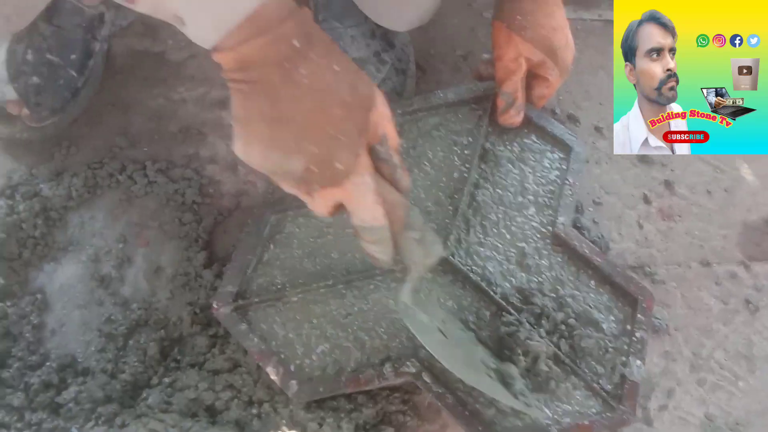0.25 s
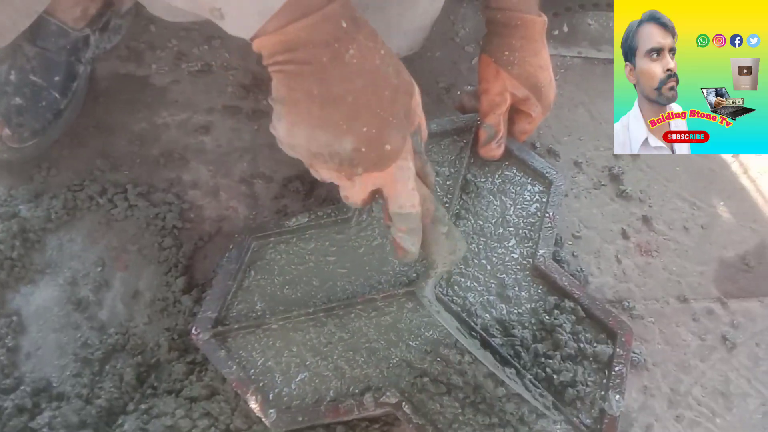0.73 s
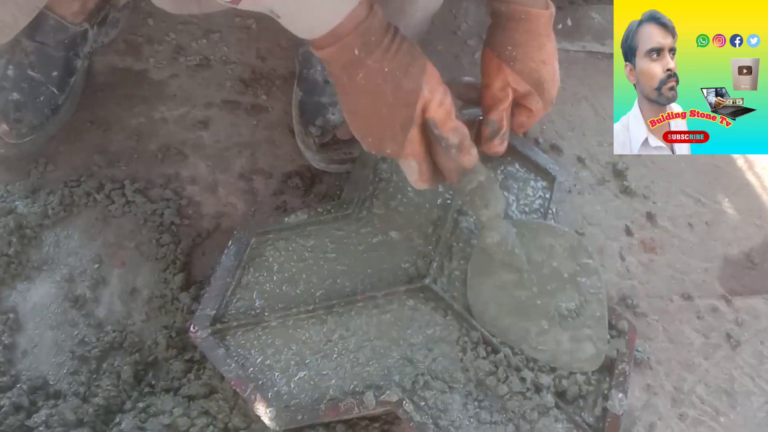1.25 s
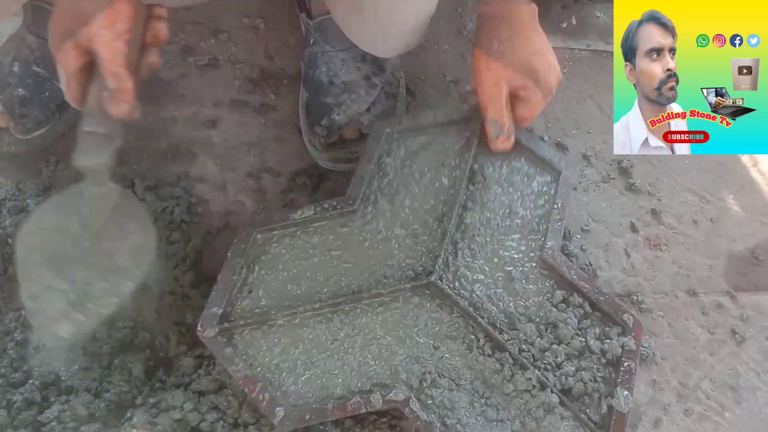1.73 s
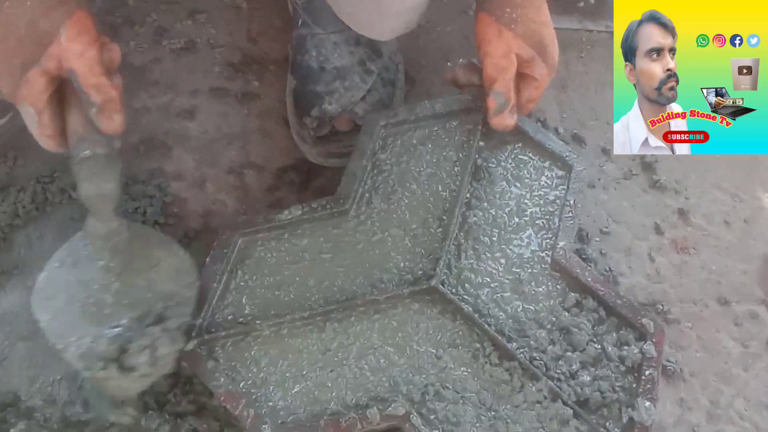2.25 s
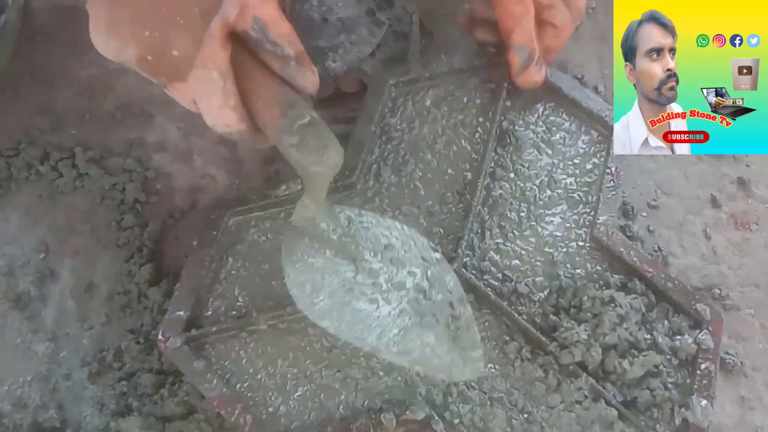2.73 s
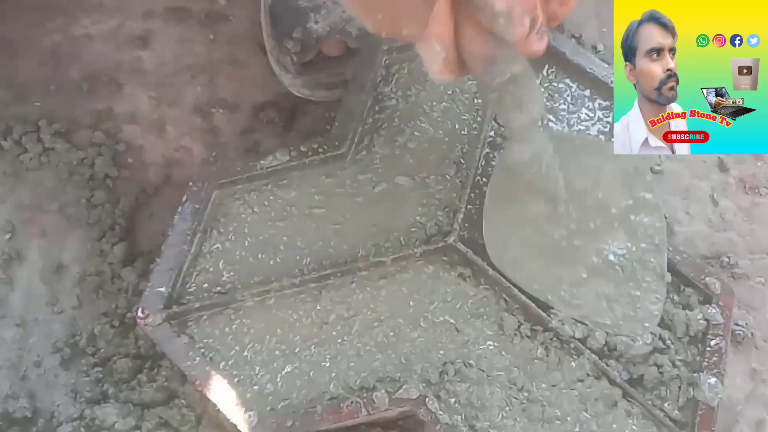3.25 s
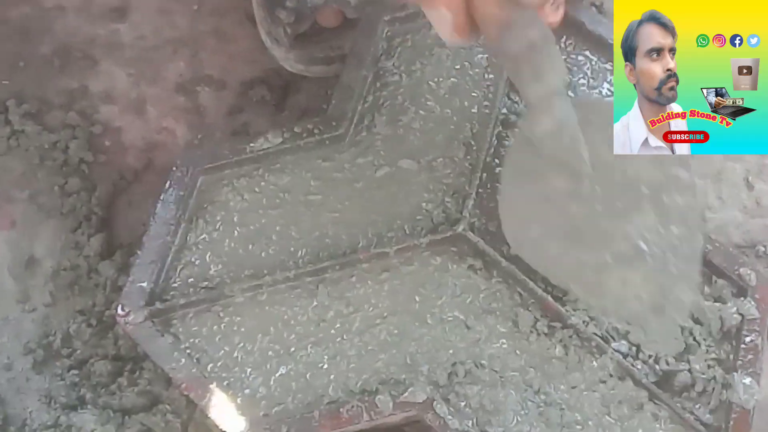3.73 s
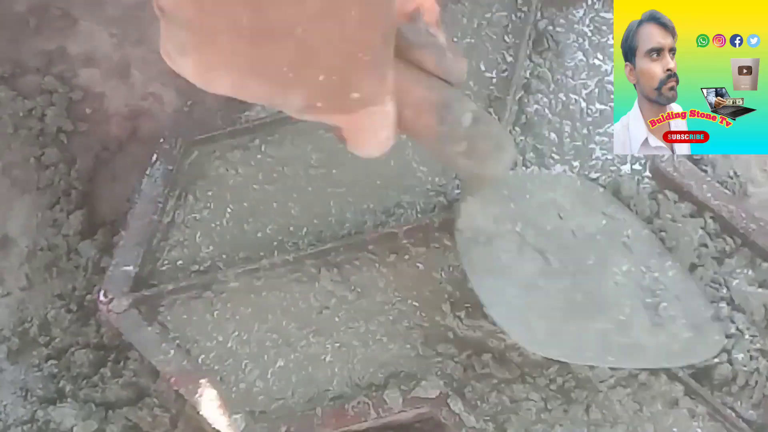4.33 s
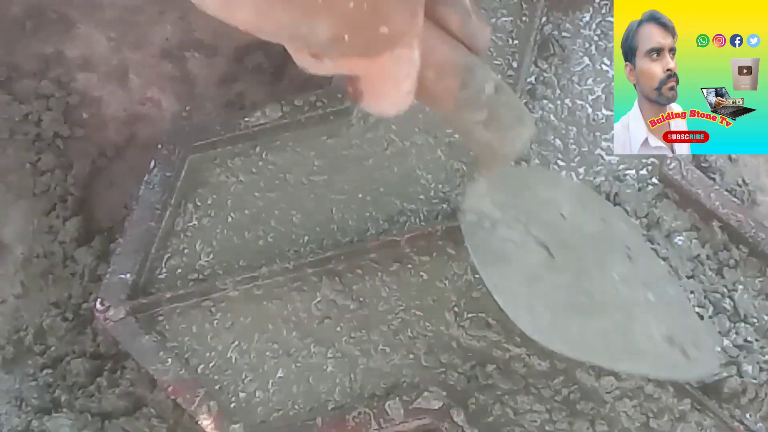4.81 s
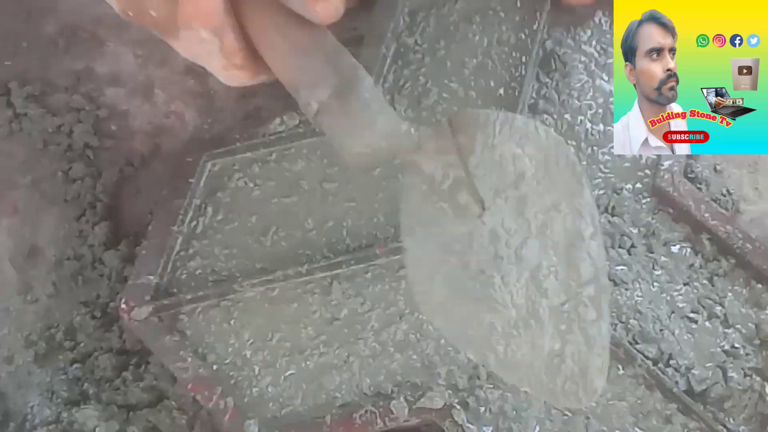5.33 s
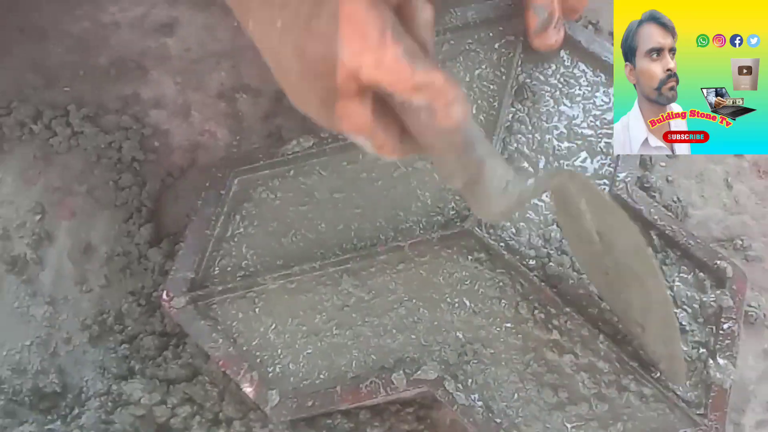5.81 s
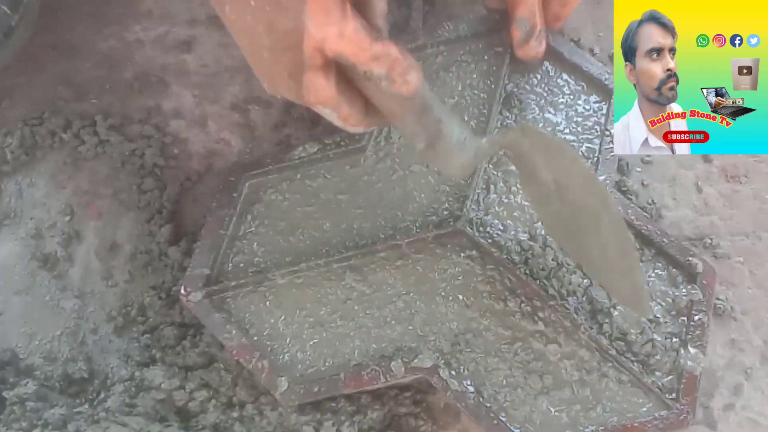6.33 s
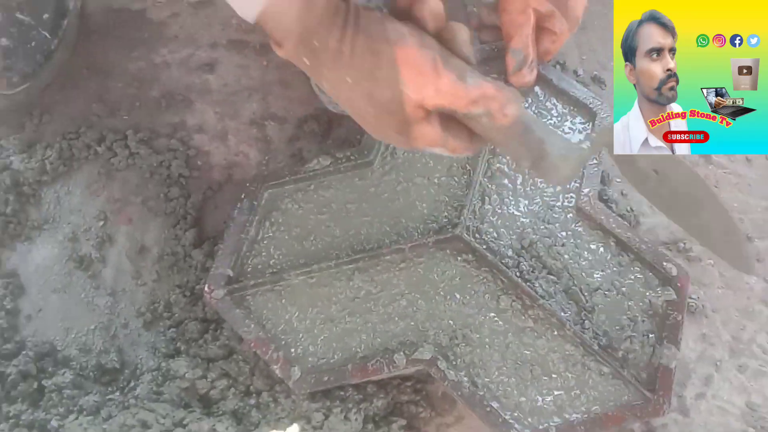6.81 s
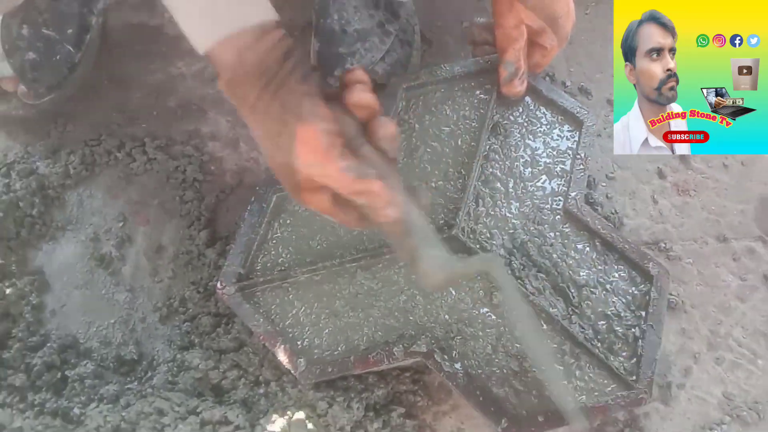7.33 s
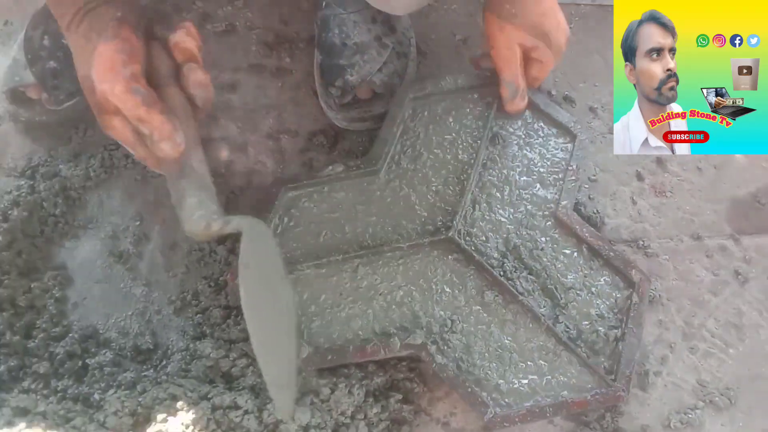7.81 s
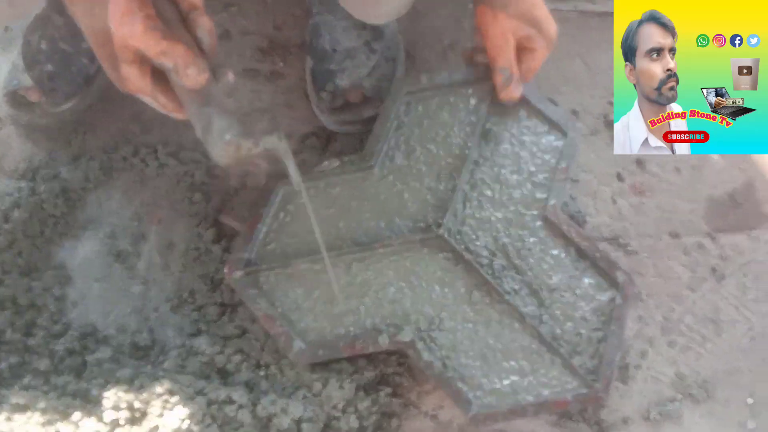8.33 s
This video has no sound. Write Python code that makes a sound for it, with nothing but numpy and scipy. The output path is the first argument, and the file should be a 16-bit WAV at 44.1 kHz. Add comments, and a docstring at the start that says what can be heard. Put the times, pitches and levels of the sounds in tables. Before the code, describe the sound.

Outdoors, very close to the microphone, a steel trowel works wet gravel concrete in a mould. Wet mix slides off with a faint hiss, two hard chops land, then dull flat pats. Scrapes and slaps follow, then a run of quick gritty chops, and finally five even, firm pats. Low rumble and a distant machine hum lie underneath, fading as a faint engine chug quickens.

```python
"""Outdoors, at a paving mould, a steel trowel pats, chops and smooths wet gravel concrete close by.
Flat pats slap the mix and knock the mould: noise bursts drive the slap's pitch and the mould's resonances.
Edge chops, flicked stones and strokes grind grit against the ringing blade: random contacts drive its modes.
Far off, a machine hums on two sine waves, and a slow single-cylinder engine chugs and gathers speed:
one puff for each firing. Wet sand slides off the blade, and coloured noise makes the rumble and open air."""
import sys
import numpy as np
from scipy import signal
from scipy.fft import rfft, irfft, next_fast_len
from scipy.io import wavfile
from scipy.ndimage import uniform_filter1d, map_coordinates

SR = 44100
rng = np.random.default_rng(int(sys.argv[2]) if len(sys.argv) > 2 else 0)


def wav_record(signal):
    """Record a signal, one row per channel, as 16-bit PCM in the file named by sys.argv[1]."""
    frames = np.transpose(np.atleast_2d(signal))
    bounded = np.clip(frames, -1, 1)
    # unit amplitude maps onto the largest positive 16-bit level
    quanta = np.round(bounded * 32767).astype(np.int16)
    wavfile.write(sys.argv[1], SR, quanta)


N = 377496  # length in samples

# outdoor background, before slight wavering: t/s, rumble level/dB, air level/dB
BACKGROUND_LEVELS = [(0, -38.5, -46), (.65, -30.5, -42), (1.1, -33.5, -52.5), (1.7, -31, -39),
                     (3.1, -32.5, -47), (3.6, -35, -48.5), (4.3, -47, -52), (6.2, -47.5, -50.5),
                     (7.0, -39, -48), (8.56, -45.5, -52)]
# tone colour of the rumble, of the open air: f/Hz, level/dB
RUMBLE_COLOUR = [(20, -20), (50, -44.5), (66, -12.5), (80, -6.5), (118, 1.5), (160, -3.5), (250, -7.5),
                 (400, -21), (700, -27.5), (2000, -78.5)]
AIR_COLOUR = [(200, -0.5), (480, 12), (680, 1), (900, 9), (1100, -2), (1280, 12), (1500, -0.5),
              (2300, -4.5), (3000, -21), (4000, -21), (5900, -32.5), (7000, -38.5), (16000, -45)]
# hum of the distant machine, before slight wavering: t/s, level/dB
HUM_LEVELS = [(.4, -34), (1.15, -36), (1.45, -30), (3.7, -39), (4.3, -49)]
# the machine's hum before and after it takes up load, when it slows and how long that takes
HUM_HZ, LOADED_HZ, SLOWS_AT_S, SLOWING_S = 132, 120.3, 2.2, 0.242

# speed of the single-cylinder engine: t/s, firings a second/Hz
ENGINE_SPEED = [(4.2, 22.5), (5.7, 22.6), (6.1, 25.6), (6.9, 28.3), (7.6, 29.7), (8.3, 30.7), (8.56, 31)]
# tone colour of its exhaust: f/Hz, level/dB
EXHAUST_COLOUR = [(30, -50), (65, -41), (95, 0), (125, -0.5), (170, 2), (250, -2), (330, -23), (430, -3.5),
                  (560, -30), (1500, -67), (5000, -55.5)]
# the engine draws near until ARRIVES_S, then grows louder with its speed (dB for each added firing a second)
IDLE_DB, DB_PER_FIRING_RATE, ARRIVES_S, APPROACH_DB_PER_S = -48.5, 1.6, 2.6, 10

# a load of mix slides off the blade: t/s, hiss level/dB, hiss centre f/Hz
SLIDING_MIX = [(0.0, -49.5, 5500), (0.154, -44, 5400), (0.16, -42, 5400), (0.204, -40.5, 5300),
               (0.214, -33, 5180), (0.244, -38, 5700), (0.382, -40.5, 4440), (0.416, -30, 4180),
               (0.48, -51, 4170)]

# strokes of the blade through the mix, before a trim for each layer:
# t/s, length/s, grinding level/dB, sand hiss level/dB
BLADE_STROKES = [(0.19, 0.26, -42.5, -59.5), (0.36, 0.11, -35.5, -52), (0.455, 0.14, -49.5, -54),
                 (0.56, 0.049, -36, -49), (0.635, .055, -48, -67), (0.73, 0.039, -40.5, -52),
                 (0.79, .045, -42.5, -62), (1.853, 0.066, -19, -39.5), (1.9, 0.16, -27.5, -38),
                 (2.52, 0.16, -51, -66), (3.265, 0.26, -23.5, -35.5), (3.69, 0.21, -18, -30.5),
                 (4.346, 0.023, -17.5, -30), (4.94, 0.064, -35, -49.5), (6.912, 0.16, -23.5, -35),
                 (7.184, 0.08, -17, -29.5), (7.312, 0.12, -17.5, -36.5), (7.41, 0.082, -36, -49.5),
                 (7.485, 0.084, -37, -37), (7.573, 0.039, -32.5, -41), (7.73, 0.11, -50.5, -59.5)]
# pressure swells and eases in one arch over a stroke (higher is more pointed); crumbs settle after it
ARCH, SETTLE_S = 0.89, 0.0069
# the drag after a chop: wait, sand hiss relative to grinding
DRAG_WAIT_S, DRAG_HISS_DB = 0.011, -13

# resonances of the blade, of the filled mould: f/Hz, width/Hz, level/dB
BLADE_MODES = [(980, 40, -2), (1275, 24, 2), (1355, 40, 0), (1570, 55, 1), (1920, 45, 1), (2130, 70, -4),
               (2272, 48, 3), (2615, 45, 3), (2845, 40, -2), (3390, 50, -3), (3830, 80, 1), (4200, 80, -1),
               (4600, 50, -4), (5240, 60, 0), (5730, 100, -1), (5930, 80, 2), (7360, 70, 1), (8280, 120, 1),
               (9200, 80, -1), (10900, 160, 0)]
MOULD_MODES = [(170, 8.3, -10.5), (235.6, 19.8, 2.5), (295, 25, -4.5), (347, 152, -1), (378.5, 17, -7),
               (497, 14, 2), (561.5, 24.3, 6), (962, 183, -4)]
# a flat blade is damped by the mix, one held on edge rings: t/s, ringing share/0-1
EDGE_SHARE = [(1.3, 0), (1.9, 0.6), (3.2, 0.21), (3.9, 0.06), (4.4, 0.37), (5.7, 0.42), (6.9, 0.73)]
# tone colour of grinding grit, fine sand, the blade's edge, the mix's dead thud: f/Hz, level/dB
GRIND_COLOUR = [(150, -25), (600, -31), (900, -8.5), (1400, -0.5), (2100, 4.5), (2800, -5), (3500, -10),
                (5000, -36.5), (9000, -48)]
SAND_COLOUR = [(1500, -22.5), (2800, -3.5), (3800, -1.5), (4600, -9), (6050, -4.5), (6600, -17),
               (7500, -18), (9500, -22.5), (12000, -23.5), (16000, -10.5)]
EDGE_COLOUR = [(700, -32.5), (1300, 7), (1550, -9), (2000, 6), (2600, -4), (3200, -17.5), (4500, -33.5),
               (9000, -91)]
THUD_COLOUR = [(50, -30), (130, -10.5), (230, 0), (330, 1.5), (450, -6.5), (650, -13), (1100, -10.5),
               (3000, -67)]

# Blow levels are nominal: each layer also gets a fixed trim in blow(), which scales rise and t60 by layer too.
# the edge flicks a single stone: t/s, blow level/dB, slap f/Hz, grit level re blow/dB
FLICKED_STONES = [(0.211, -29.5, 1160, -15), (0.746, -24.5, 1290, -22.5), (1.357, -26, 1690, -42),
                  (1.872, -15.5, 2000, -20), (2.648, -24, 2170, -4), (4.056, -26.5, 1550, -15),
                  (5.785, -33.5, 2280, -3.5), (7.222, -11.5, 1470, -43), (7.409, -12, 2420, -26.5)]
# a stone: its dying away, the mould's knock re the blow, the steel's ring over the grit
STONE_T60_S, STONE_KNOCK_DB, STONE_BLADE_DB = 0.065, -15, 3.5
# chops with the edge, each followed by a drag as the blade is drawn out: t/s, blow level/dB, slap f/Hz,
# mould knock level re blow/dB, grit level re blow/dB, drag level/dB, drag length/s
EDGE_CHOPS = [(1.176, -1, 1605, -26, -27.5, -36, 0.047), (1.295, -5, 1670, -14.5, -21.5, -57, 0.029),
              (3.25, -4.5, 1500, -40, -17, -32.5, 0.1), (3.64, -9.5, 2000, -26.5, -15, -18, 0.029),
              (4.076, -1.5, 1530, -39, -33, -35.5, 0.082), (4.324, -19, 1690, -6, -19.5, -32.5, 0.12),
              (4.563, -7.5, 1800, -48, -19, -29.5, 0.092), (4.734, -10.5, 1960, -17.5, -15, -35.5, 0.11),
              (4.895, -18, 2040, -27, -19.5, -31, .03), (5.651, -7, 2040, -15.5, -20, -32, 0.055),
              (5.804, -11, 2020, -24.5, -11, -29, 0.071), (5.962, -12, 2320, -17, -10, -31.5, 0.073),
              (6.115, -5.5, 2300, -25, -17.5, -25, 0.055), (6.257, -10, 2400, -24.5, -15, -30.5, .055),
              (6.396, -11.5, 2200, -22, -12, -36, 0.053), (6.586, -21.5, 1240, -7, 0.5, -38, .07),
              (6.910, -8, 1280, -12, -23, -30, 0.063), (7.157, -6, 1230, -20, -19, -40, .04),
              (7.286, -9, 1550, -23.5, -15, -29, 0.043)]
# a chop: time to full contact, its dying away, the steel's ring over the grit that excites it
CHOP_RISE_S, CHOP_T60_S, BLADE_OVER_GRIT_DB = 0.0023, 0.045, 5
# at full contact the edge of a chop cracks against a stone: level re the blow
CRACK_DB = -18
# flat pats on the mix: t/s, blow level/dB, slap f/Hz, mould knock level re blow/dB,
# grit level re blow/dB, t60/s (time to die away by 60 dB)
FLAT_PATS = [(0.82, -26, 660, -2.5, -38, 0.055), (1.624, -3.5, 630, -13, -31.5, .04),
             (1.698, -21.5, 1020, -3, -51, .035), (1.802, -8, 616, -7, -27, 0.064),
             (1.965, -5, 553, -10.5, -39, 0.031), (2.119, -16, 573, -10, -32.5, 0.036),
             (2.810, -1.5, 960, -15, -35, .026), (3.004, -3.5, 1054, -14, -42.5, 0.019),
             (4.323, -6, 960, -10, -38, 0.038), (5.133, -3, 960, -11.5, -46, 0.048),
             (5.209, -22, 600, -7.5, -64, 0.044), (5.306, -6.5, 794, -7.5, -55.5, .06),
             (5.483, -9, 550, -4.5, -44.5, .055), (6.531, -4, 1014, -14, -33.5, 0.02),
             (6.719, -4.5, 1220, -10.5, -38, .055), (6.763, -25, 510, -3, -30.5, 0.032),
             (7.836, -2, 1154, -17, -42.5, 0.048), (7.983, -5, 1225, -11, -50, 0.026),
             (8.128, -7, 1190, -9, -32.5, .032), (8.283, -4.5, 1170, -11.5, -46, 0.054),
             (8.431, -15.5, 470, -1, -59, 0.063)]
# a pat: time to full contact, the steel at full force, its dB re the blow lost for each dB softer
PAT_RISE_S, PAT_BLADE_DB, SOFT_DULLS = .0036, -12.5, 0.66
# the mould rocks on the ground after a pat: level re its knock, dying away
ROCK_DB, ROCK_T60_S = -17, 1
LEAD = SR // 100  # samples of brushing contact before a blow bites

# microphone port: f/Hz, level/dB
PORT_COLOUR = [(13000, -1), (14200, -5), (14900, 4), (15500, 6), (15800, -14), (16300, -15)]
TOP_HZ = 16300  # band limit
# the loudest peaks round off before the port: ceiling in dB full scale
CEILING_DB = -3


def amp(db):
    """Turn decibels into gain."""
    return 10 ** (np.asarray(db) / 20)


def unit(x):
    """Bring x to rms 1."""
    return x / np.sqrt(np.mean(x ** 2) + 1e-20)


def punch(x):
    """Bring the loudest few milliseconds of x to rms 1."""
    return x / np.sqrt(uniform_filter1d(x * x, size=300).max())


def curves(rows):
    """Draw one value per sample for each column after the time."""
    s, *cols = np.transpose(rows)
    return [np.interp(np.arange(N) / SR, s, c) for c in cols]


def wobble(rate):
    """Draw a smooth random curve with this many knots a second."""
    knots = rng.standard_normal(int(N * rate / SR) + 4)
    return map_coordinates(knots, [np.arange(N) * rate / SR])


def add(out, s, x):
    """Mix x into out from time s on."""
    part = out[round(s * SR):][:len(x)]
    part += x[:len(part)]


def filtered(x, response):
    """Multiply the spectrum of x by a response that depends on frequency."""
    m = 2 * next_fast_len(len(x) // 2 + 2048)
    return irfft(rfft(x, m) * response(np.fft.rfftfreq(m, 1 / SR)), m)[:len(x)]


def colour(points, hz):
    """Make a response without pre-echo that follows (Hz, dB) points on a log axis."""
    f, db = np.transpose(points)
    gain = amp(np.interp(np.log(hz + 1), np.log(f), db))
    cepstrum = irfft(np.log(gain))
    # folding the cepstrum forward in time puts all sound after the cause
    cepstrum[1:len(hz) - 1] *= 2
    cepstrum[len(hz):] = 0
    return np.exp(rfft(cepstrum))


def shaped(x, points):
    """Colour x by a spectrum, at rms 1."""
    return unit(filtered(x, lambda hz: colour(points, hz)))


def ringing(modes, hz):
    """Add up resonances (Hz, width, dB) of alternating sign; a narrow one rings longer."""
    total = 0
    for k, (centre, width, db) in enumerate(modes):
        resonance = 1j * hz * width / (centre * centre - hz * hz + 1j * hz * width)
        total = total + (-1) ** k * amp(db) * resonance
    return total


def grit(size, per_second, spread_db, smooth):
    """Scatter tiny contacts of uneven strength over a share of smooth noise."""
    hits = rng.random(size) < per_second / SR
    strength = amp(spread_db * rng.uniform(-0.94, 1, size))
    contacts = hits * rng.standard_normal(size) * strength
    return unit(unit(contacts) + smooth * rng.standard_normal(size))


def on_blade(x, share):
    """Send a share of the contact force x into the resonances of the steel."""
    share = np.clip(share, 0, 1)
    ring = unit(filtered(x, lambda hz: ringing(BLADE_MODES, hz)))
    return (1 - share) * unit(x) + share * ring


def edge_share(s):
    """Look up how freely the blade rings at time s."""
    return np.interp(s, *np.transpose(EDGE_SHARE))


def open_air():
    """Low rumble and open air are coloured noises whose levels waver."""
    rumble_db, air_db = curves(BACKGROUND_LEVELS)
    rumble = amp(rumble_db + 2.1 * wobble(25)) * shaped(rng.standard_normal(N), RUMBLE_COLOUR)
    air = amp(air_db + 1.2 * wobble(6.7)) * shaped(rng.standard_normal(N), AIR_COLOUR)
    return rumble + air


def machine_hum():
    """A far machine hums on a wavering tone and its half-speed tone, slows and recedes."""
    hum_hz, = curves([(SLOWS_AT_S, HUM_HZ), (SLOWS_AT_S + SLOWING_S, LOADED_HZ)])
    hum_db, = curves(HUM_LEVELS)
    phase = 2 * np.pi * np.cumsum(hum_hz + 1.12 * wobble(9)) / SR
    tones = unit(np.sin(phase) + .33 * np.sin(phase / 2))
    return amp(hum_db + 2.4 * wobble(13)) * tones


def engine():
    """Each firing gives one exhaust puff, a little uneven and dulled by distance; faster is louder."""
    rate, = curves(ENGINE_SPEED)
    still_to_come = np.maximum(ARRIVES_S - np.arange(N) / SR, 0)
    db = IDLE_DB + DB_PER_FIRING_RATE * (rate - rate[0]) - APPROACH_DB_PER_S * still_to_come
    cycles = np.cumsum(rate) / SR
    firings = np.diff(np.floor(cycles), prepend=0) * amp(1.3 * wobble(30))
    gas = amp(-45 * (cycles % 1)) * rng.standard_normal(N)  # noise that fades after each firing
    puffs = filtered(unit(firings) + .3 * unit(gas), lambda hz: 1 / (1 + (hz / 1500) ** 4))
    return amp(db) * shaped(puffs, EXHAUST_COLOUR)


def slide():
    """Wet sand hisses off the tilted blade, lower overall in pitch as more of the steel is bared."""
    s, db, centre_hz = np.transpose(SLIDING_MIX)
    unevenness = amp(1.6 * wobble(90) + 1.2 * wobble(300))
    grains = unevenness * grit(N, per_second=1500, spread_db=5, smooth=.6)
    # boost a band around the moving centre
    hz, t, z = signal.stft(shaped(grains, SAND_COLOUR), SR, nperseg=256)
    octaves = np.log2((hz[:, None] + 1) / np.interp(t, s, centre_hz))
    boost = amp(10.3 * np.exp(-(octaves / 0.43) ** 2))
    hiss = signal.istft(z * boost, SR, nperseg=256)[1][:N]
    hiss = hiss / np.std(hiss[:int(s[-1] * SR)])
    hiss = hiss + amp(-17) * shaped(grains, GRIND_COLOUR)
    return hiss * amp(np.interp(np.arange(N) / SR, s, db + 0.16, right=-120))


def scrape(gain, force, share, spectrum):
    """A rough force at the given rms gain drives the blade, whose resonances drift as it flexes."""
    flex = np.arange(N) + .0002 * SR * wobble(20)
    steel = map_coordinates(on_blade(gain * force, share), [flex])
    return np.sqrt(np.mean(gain ** 2)) * shaped(steel, spectrum)


def strokes():
    """In strokes and drags, gravel catches and slips along the ringing blade; fine sand hisses above."""
    gains = np.zeros((2, N))
    drags = [(s + DRAG_WAIT_S, length, db, db + DRAG_HISS_DB) for s, *_, db, length in EDGE_CHOPS]
    for s, length, grind_db, hiss_db in list(BLADE_STROKES) + drags:
        pressure = np.abs(np.sin(np.linspace(0, np.pi, int(length * SR)))) ** ARCH
        add(gains[0], s, amp(grind_db) * pressure)
        add(gains[1], s, amp(hiss_db) * pressure)
    keep = np.exp(-1 / (SETTLE_S * SR))
    grind_gain, hiss_gain = signal.lfilter([1 - keep], [1, -keep], gains + 1e-9)
    free, = curves(EDGE_SHARE)
    catching = amp(1.7 * wobble(70) + 1.5 * wobble(260))
    pebbles = .5 * grit(N, per_second=300, spread_db=4, smooth=0)
    gravel = catching * (pebbles + grit(N, per_second=2000, spread_db=5.5, smooth=1.0))
    sand = catching * (pebbles + grit(N, per_second=3300, spread_db=1.5, smooth=1.0))
    grinding = amp(-1.8) * scrape(grind_gain, gravel, free, GRIND_COLOUR)
    hiss = amp(-3.0) * scrape(hiss_gain, sand, free * .6, SAND_COLOUR)
    return grinding + hiss


def burst(t, rise, t60, tail_db, tail_t60, touch_db):
    """The blade brushes the top stones, bites at t = 0, stops, and the mix settles in a weak tail."""
    late = np.maximum(t - rise, 0)
    touch = amp(touch_db) * np.clip(1 + t / 0.0065, 0, 1)
    attack = np.clip(t / rise, touch, 1)
    decay = amp(-60 * late / t60) + amp(tail_db - 60 * late / tail_t60)
    return attack * decay * grit(len(t), per_second=6000, spread_db=8.0, smooth=0.26)


def blow(slap_hz, knock_db, blade_db, grit_db, rise, t60, free):
    """One blow squeezes wet mix, knocks the mould, rings the blade and crushes sand."""
    t = np.arange(-LEAD, SR // 5) / SR
    cushion_db = np.interp(slap_hz, [1200, 1500], [-18, -40])  # only low, flat pats land softly
    # the pocket of slurry under the blade sets the pitch of the slap
    pocket = [(slap_hz / 5, -27), (slap_hz / 1.28, -8), (slap_hz, -1), (slap_hz * 2.13, -20), (slap_hz * 5, -72)]
    squeeze = burst(t, rise * 0.68, t60 * 1.32, tail_db=-30.0, tail_t60=0.14, touch_db=cushion_db)
    slap = shaped(squeeze, pocket)
    ping = np.interp(slap_hz, [1200, 1600, 2100], [.3, .9, .3])  # a small closed pocket rings best
    slap = slap + ping * unit(filtered(slap, lambda hz: ringing([(slap_hz, slap_hz * 0.1, 0)], hz)))
    # the packed mix gives a dead thud, the mould's walls ring briefly after it
    push = burst(t, rise * 1.35, t60 * .5, tail_db=-11, tail_t60=0.17, touch_db=cushion_db)
    walls = filtered(push, lambda hz: ringing(MOULD_MODES, hz) / (1 + (hz / 1500) ** 4))
    knock = shaped(push, THUD_COLOUR) + 0.86 * unit(walls)
    strike = burst(t, rise * .5, t60 * 0.81, tail_db=-23.5, tail_t60=0.23, touch_db=-32.5)
    edge = shaped(on_blade(strike, free * 0.26), EDGE_COLOUR)
    crush = burst(t, rise * 0.19, t60 * 0.67, tail_db=-13.5, tail_t60=0.16, touch_db=-19)
    sand = shaped(on_blade(crush, free * .5), SAND_COLOUR)
    wet = amp(-11.5) * punch(slap) + amp(knock_db + 1.0) * punch(knock)
    return wet + amp(blade_db - 3.5) * punch(edge) + amp(grit_db - 3.5) * punch(sand)


def stones():
    """A flicked stone rings the steel in proportion to the grit it crushes."""
    out = np.zeros(N + LEAD)
    for s, db, hz, grit_db in FLICKED_STONES:
        blade_db = grit_db + STONE_BLADE_DB
        hit = blow(hz, STONE_KNOCK_DB, blade_db, grit_db, CHOP_RISE_S, STONE_T60_S, edge_share(s))
        add(out, s, amp(db) * hit)
    return out[LEAD:]


def chops():
    """An edge chop rings the steel as it crushes grit, then cracks against a stone at full contact."""
    out = np.zeros(N + LEAD)
    for s, db, hz, knock_db, grit_db, _, _ in EDGE_CHOPS:
        free = edge_share(s)
        blade_db = grit_db + BLADE_OVER_GRIT_DB
        add(out, s, amp(db) * blow(hz, knock_db, blade_db, grit_db, CHOP_RISE_S, CHOP_T60_S, free))
        crack = shaped(on_blade(signal.unit_impulse(SR // 2), free * .7), GRIND_COLOUR)
        add(out, s + LEAD / SR + CHOP_RISE_S, amp(db + CRACK_DB) * punch(crack))
    return out[LEAD:]


def pats():
    """A flat pat thuds, then the mould rocks on the ground as a low rumble cut off after half a second."""
    out, t = np.zeros(N + LEAD), np.arange(SR // 2) / SR
    for s, db, hz, knock_db, grit_db, t60 in FLAT_PATS:
        blade_db = PAT_BLADE_DB + SOFT_DULLS * db
        add(out, s, amp(db) * blow(hz, knock_db, blade_db, grit_db, PAT_RISE_S, t60, edge_share(s)))
        rocking = shaped(rng.standard_normal(len(t)), RUMBLE_COLOUR) * amp(-60 * t / ROCK_T60_S)
        add(out, s + LEAD / SR, amp(db + knock_db + ROCK_DB) * rocking)
    return out[LEAD:]


def scene():
    """Everything reaches one microphone, alike in both channels."""
    background = open_air() + machine_hum() + engine()
    trowel = slide() + strokes() + stones() + chops() + pats()
    mono = background + trowel
    return np.array([mono, mono])


def record(dry):
    """Peaks are gently rounded; the microphone port resonates in the top treble, under the band limit."""
    rounded = dry / (1 + (dry / amp(CEILING_DB)) ** 4) ** (1 / 4)
    return np.array([filtered(x, lambda hz: colour(PORT_COLOUR, hz) * (hz < TOP_HZ)) for x in rounded])


dry = scene()
out = record(dry)
wav_record(out)
```